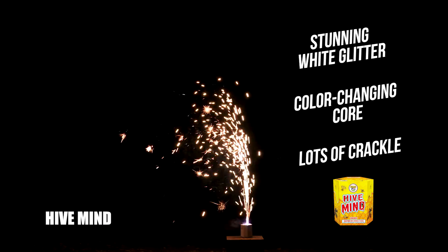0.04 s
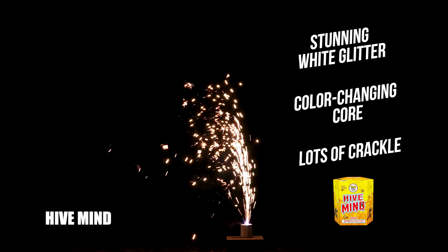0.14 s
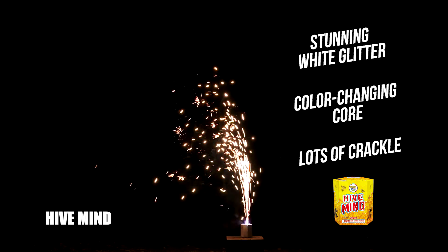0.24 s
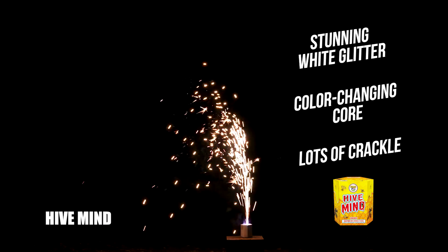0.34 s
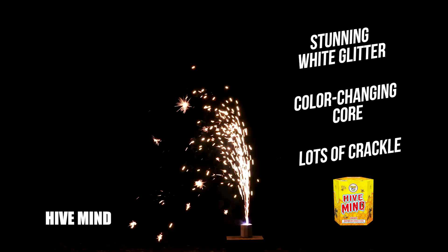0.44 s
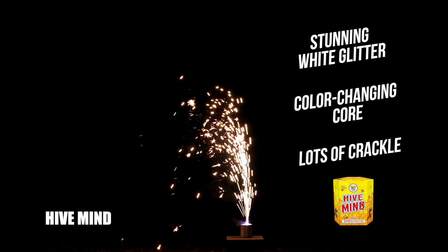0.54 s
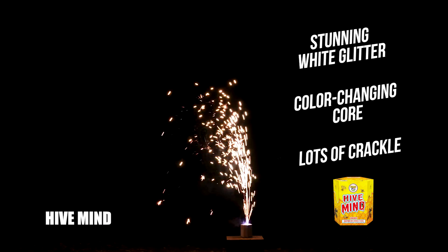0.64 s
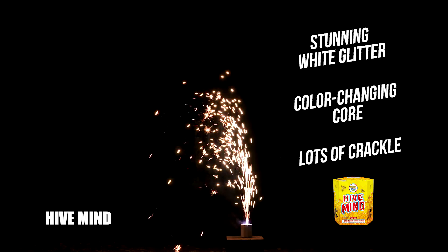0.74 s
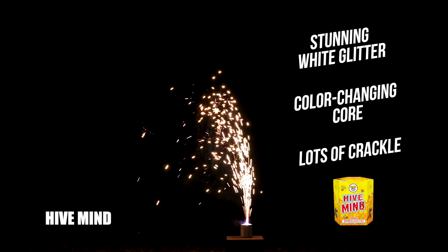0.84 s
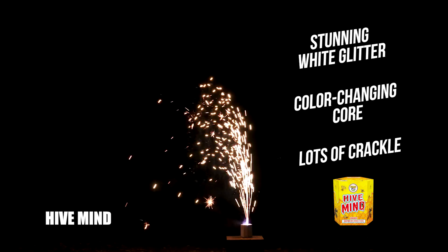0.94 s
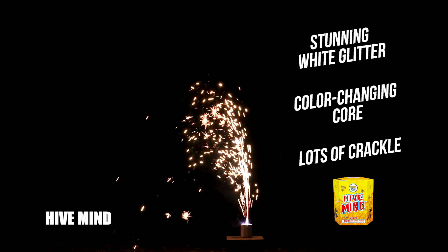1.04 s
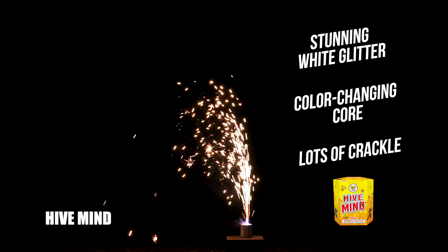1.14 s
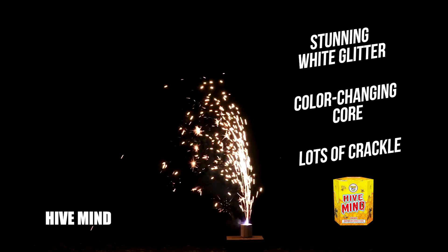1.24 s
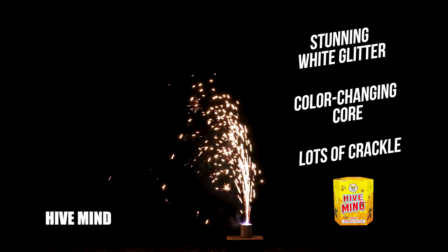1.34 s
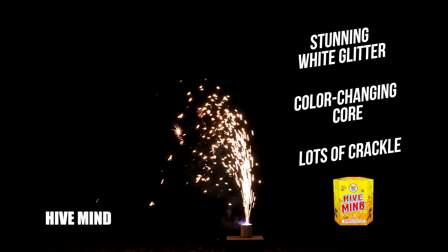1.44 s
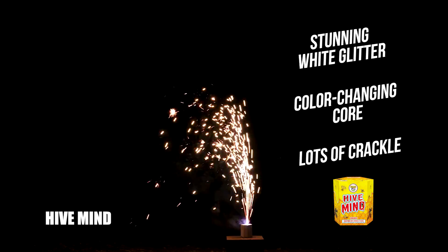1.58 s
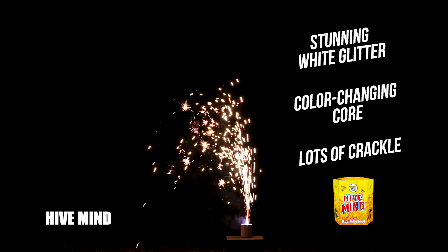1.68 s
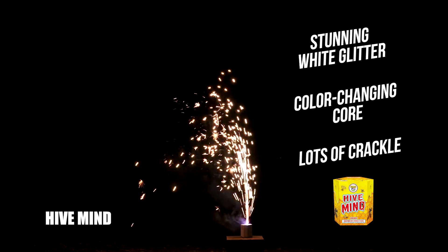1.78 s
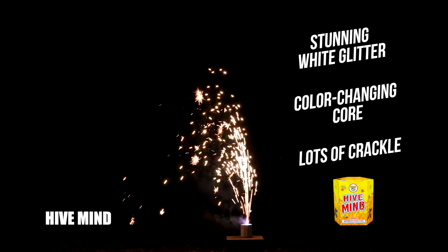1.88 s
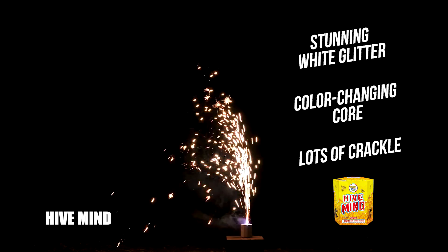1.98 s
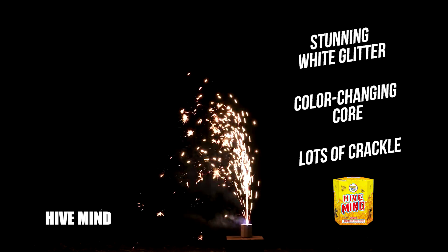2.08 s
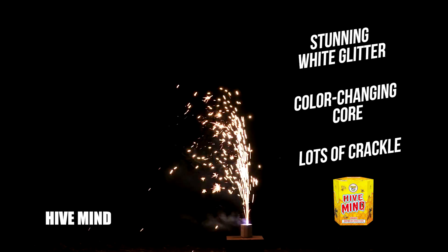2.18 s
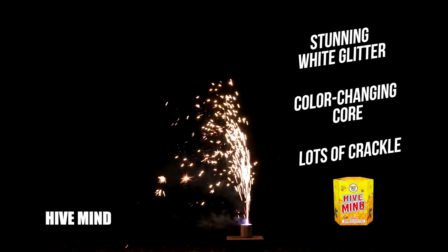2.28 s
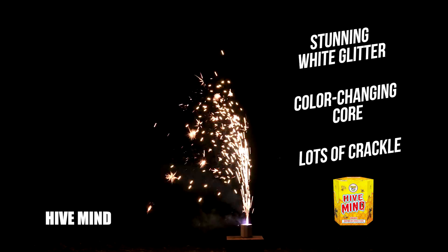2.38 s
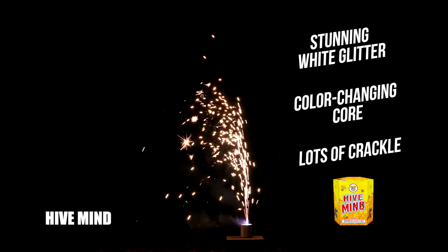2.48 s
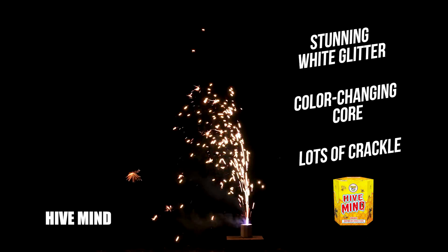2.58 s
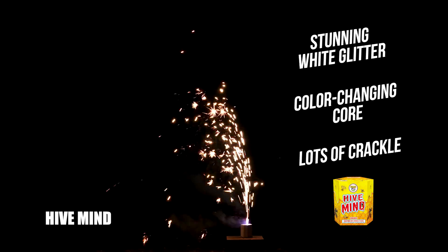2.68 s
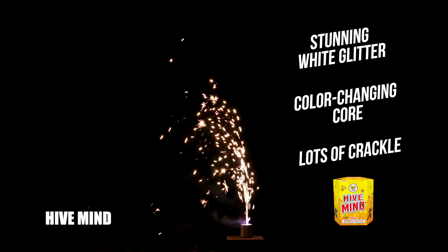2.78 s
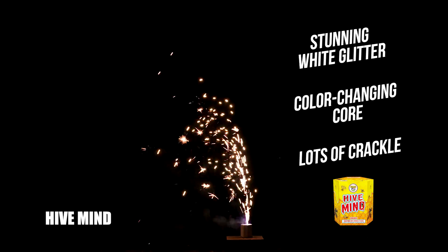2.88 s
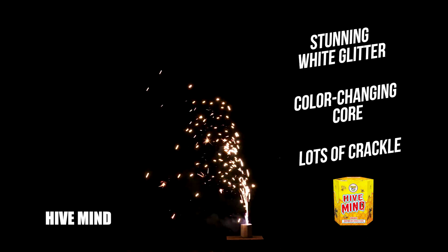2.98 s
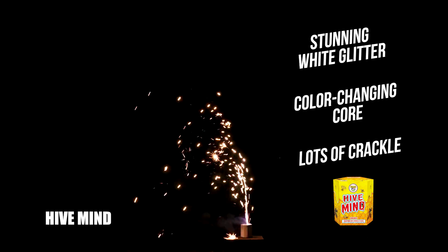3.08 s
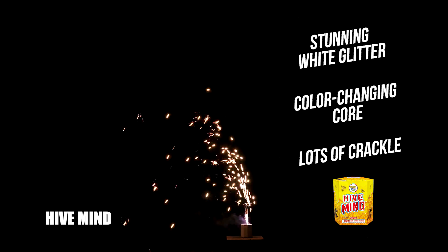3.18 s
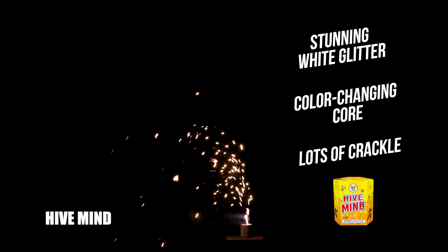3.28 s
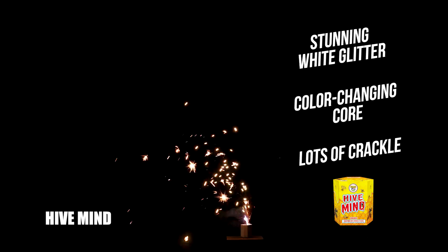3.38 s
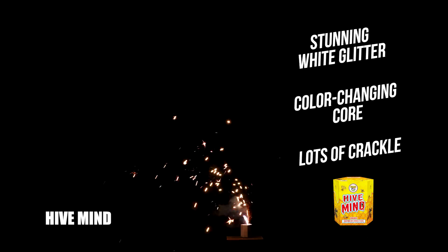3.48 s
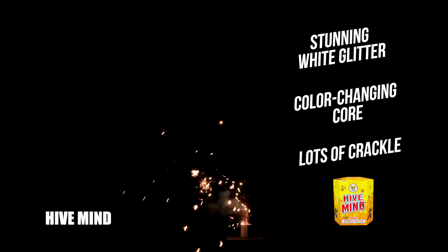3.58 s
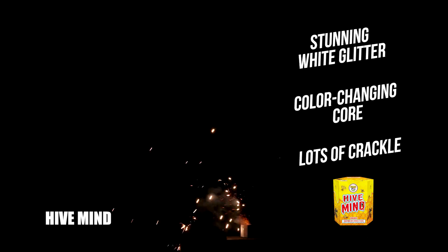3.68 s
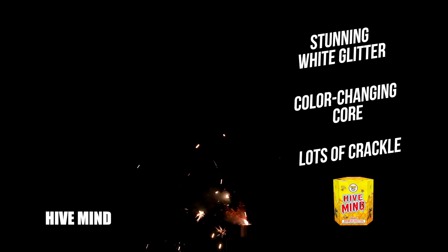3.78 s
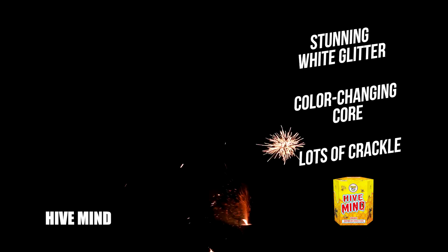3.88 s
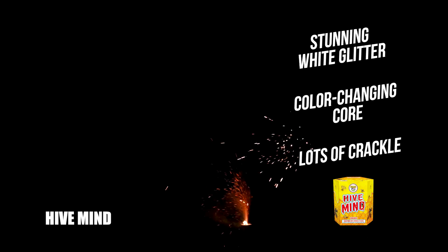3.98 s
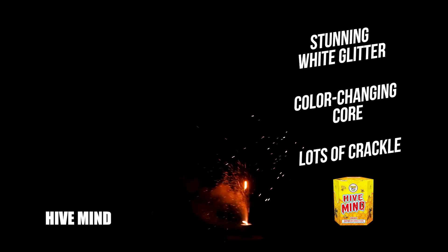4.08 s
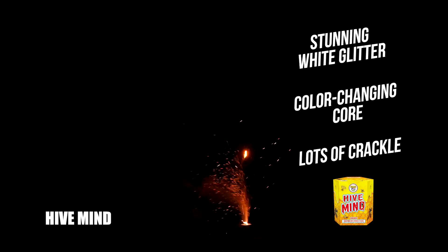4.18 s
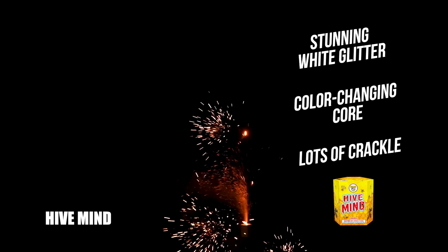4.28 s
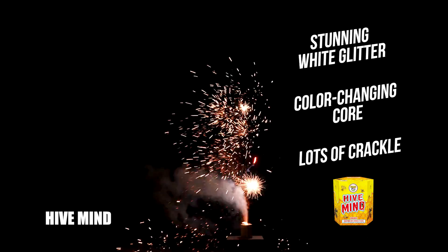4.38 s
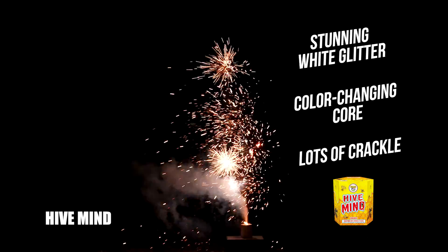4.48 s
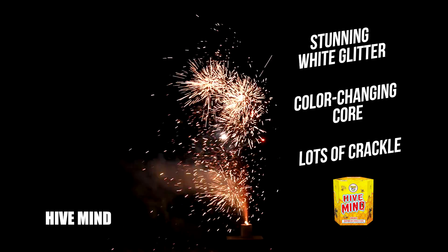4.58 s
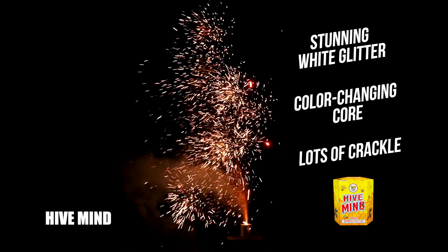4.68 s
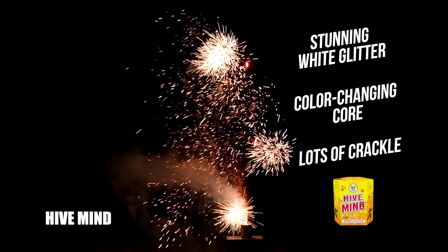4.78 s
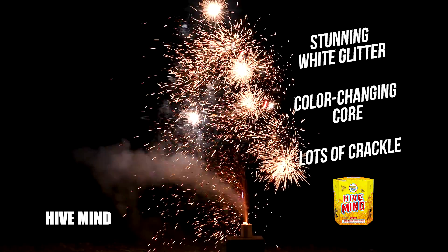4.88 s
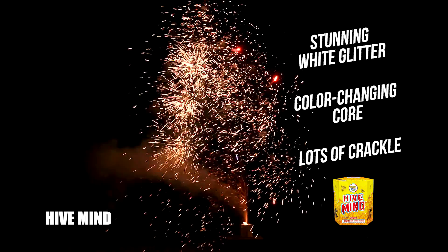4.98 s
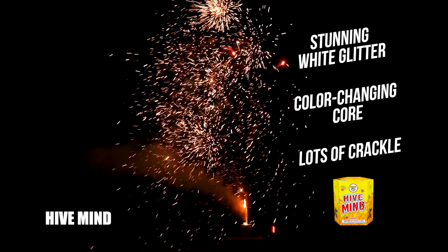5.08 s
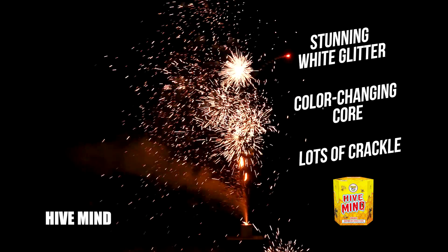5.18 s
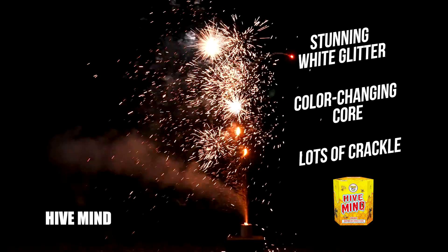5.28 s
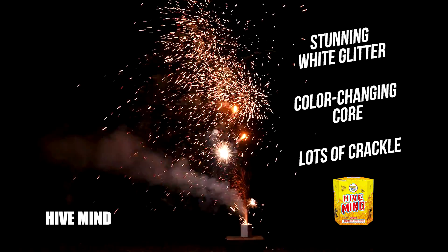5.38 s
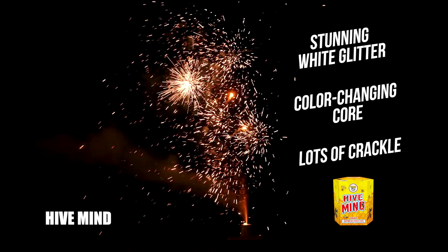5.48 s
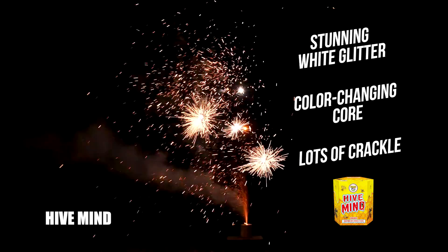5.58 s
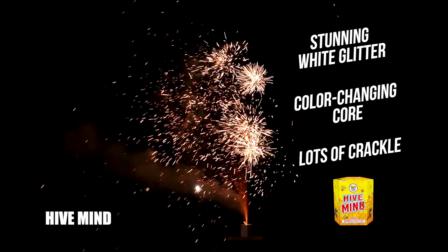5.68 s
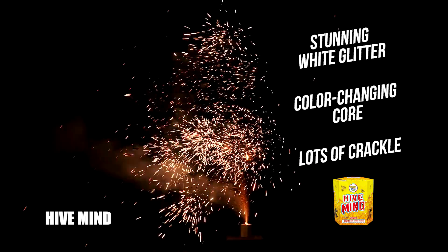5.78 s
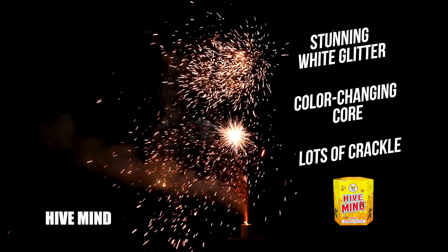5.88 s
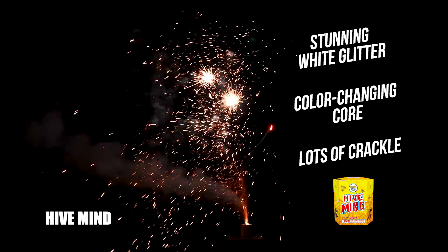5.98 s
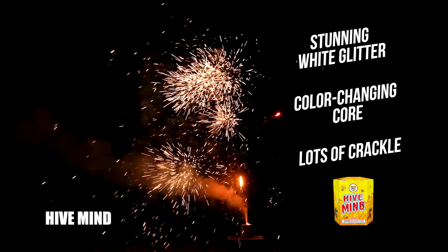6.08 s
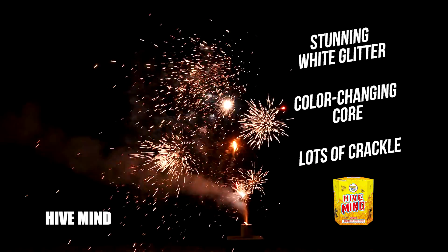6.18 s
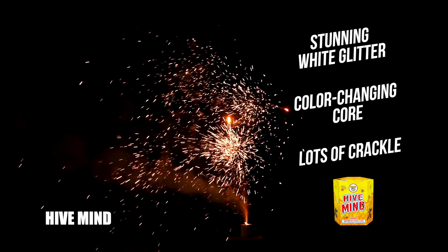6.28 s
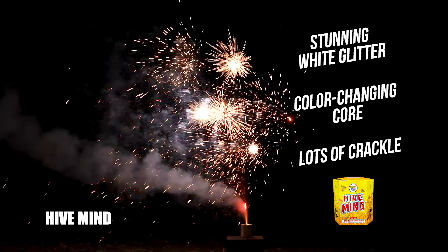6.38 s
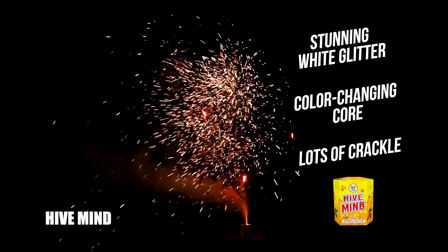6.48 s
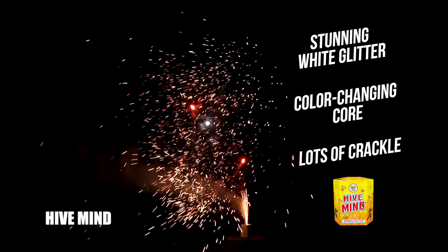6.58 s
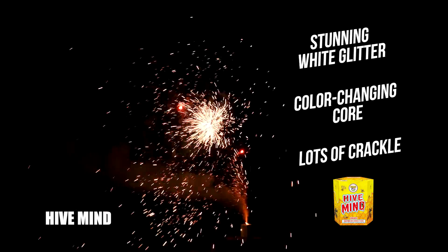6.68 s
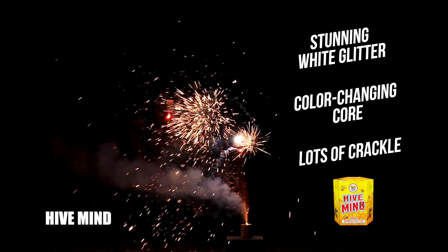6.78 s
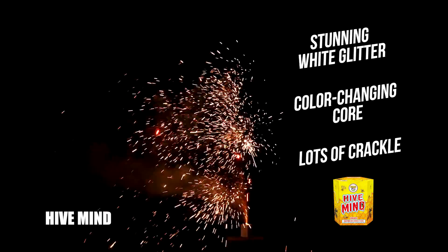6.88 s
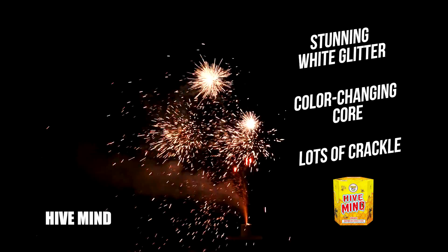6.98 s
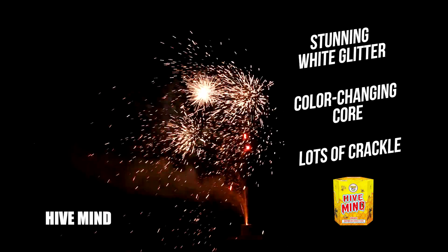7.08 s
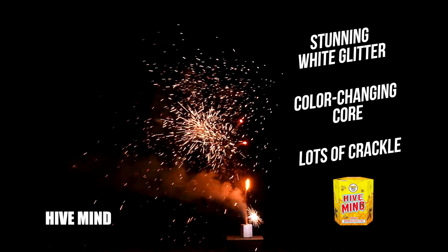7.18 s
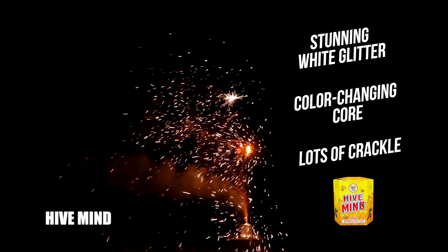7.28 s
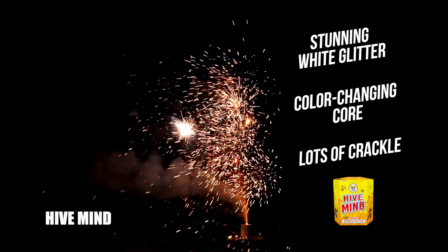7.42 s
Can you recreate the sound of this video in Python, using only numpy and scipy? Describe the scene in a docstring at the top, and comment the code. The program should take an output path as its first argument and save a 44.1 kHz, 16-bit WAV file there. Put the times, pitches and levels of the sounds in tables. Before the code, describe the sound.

Outdoors, a few metres from a stereo microphone, a fountain firework hisses and roars while sparks tick and spit. About halfway through it dies down to scattered spits, then a second stage catches. Dense clusters of loud crackles and sharp snaps follow one another to the end, with occasional dull puffs and a soft hiss beneath. The sound is fairly dry and leans slightly left, with a faint open-air rumble behind it.

```python
"""A ground fountain firework roars, then crackles, outdoors at night a few metres from a stereo pair.
Its gas jet roars and hisses through the nozzle, spitting sparks, then sputters out. A softer second
stage throws up crackle stars, each bursting in a cluster of tiny shocks a few milliseconds long.
Dull puffs cough from the tube. Underneath lie the rumble of the open air and a faint low drone."""
import sys
import numpy as np
from scipy import signal
from scipy.fft import rfft, irfft
from scipy.io import wavfile

SR = 44100
rng = np.random.default_rng(int(sys.argv[2]) if len(sys.argv) > 2 else 0)


def generate_wav(sig):
    """Save sig (samples, or channels by samples) to the path in sys.argv[1] as 16-bit PCM at SR."""
    pcm = np.round(np.clip(np.atleast_2d(sig).T, -1, 1) * 32767).astype(np.int16)
    wavfile.write(sys.argv[1], SR, pcm)


N = 328545
TIME = np.arange(N) / SR
HZ = np.fft.rfftfreq(N, 1 / SR)
BAND_LIMIT_HZ = 16000


def amp(db):
    """Decibels to gain."""
    return 10 ** (np.asarray(db) / 20)


def curve_at(points, hz):
    """A table joined by straight lines on a log-frequency axis."""
    f, value = np.transpose(points)
    return np.interp(np.log(hz + 1), np.log(f + 1), value)


def band_rms(gain, lo, hi):
    """Rms in one band of unit white noise shaped by gain."""
    return np.sqrt(np.mean(gain ** 2 * (HZ > lo) * (HZ < hi)))


def lowpass(x, hz, order=2):
    """Rolls off the top above hz."""
    return signal.sosfilt(signal.butter(order, min(hz, SR / 3), fs=SR, output="sos"), x)


def wander(rate_hz):
    """Random modulation of unit spread, moving at up to about rate_hz."""
    drift = irfft(rfft(rng.standard_normal(N)) / (1 + (HZ / rate_hz) ** 4), N)
    return drift / drift.std()


def shocks(times, sizes, spread_us):
    """Pressure spikes, each from its own direction, so the two mics hear it microseconds apart."""
    out = np.zeros((2, N))
    centre = np.round(times * SR)
    lag = rng.standard_normal(len(times)) * spread_us / 10 ** 6 / 2 * SR
    for channel, at in zip(out, (centre + lag, centre - lag)):
        taps = np.round(at).astype(int)[:, None] + np.arange(-6, 7)
        away = taps - at[:, None]
        spikes = sizes[:, None] * np.sinc(away) * np.sinc(away / 7)  # lands between samples
        inside = (taps >= 0) & (taps < N)
        np.add.at(channel, taps[inside], spikes[inside])
    return out


def knocks(times, sizes, bass_db, spread_us, bass_hz):
    """Shocks, each with its own low shelf for weight."""
    extra = shocks(times, sizes * (amp(bass_db) - 1), spread_us=0)
    return shocks(times, sizes, spread_us) + lowpass(extra, bass_hz, order=1)


def pops(spikes, tone, size=4096):
    """Turns every spike into a pop of the given colour: a steep front, then a shallow underpressure."""
    hz = abs(np.fft.fftfreq(size, 1 / SR))
    log_gain = np.log(amp(curve_at(tone, hz)))
    pop = np.fft.ifft(np.exp(np.conj(signal.hilbert(log_gain)))).real  # minimum phase
    treble_power = np.mean(np.exp(2 * log_gain) * (hz > 2000) * (hz < BAND_LIMIT_HZ))
    pop = pop[None, :size // 2] / np.sqrt(treble_power)
    return signal.oaconvolve(spikes, pop, axes=1)[:, :N]


# how alike the two mics hear a noise: f/Hz, correlation/0-1
STEREO_LIKENESS = [(30, 0.83), (200, 0.98), (2000, 0.98), (7000, 1), (15000, 0.38)]

def stereo_noise(gain):
    """Coloured noise, narrow in the mids and wide in the top treble."""
    left, other = rfft(rng.standard_normal((2, N)))
    same = curve_at(STEREO_LIKENESS, HZ)
    right = same * left + np.sqrt(1 - same ** 2) * other
    return irfft(np.array([left, right]) * gain, N)


# colour of the outdoor bed: f/Hz, level/dB
AIR_TONE = [(10, -12.5), (35, 3), (65, -4.5), (110, -8), (500, -13), (2000, -47)]

def air_rumble(db=-60.5):
    """The steady low rumble of the open air."""
    gain = amp(curve_at(AIR_TONE, HZ))
    return stereo_noise(gain / band_rms(gain, 0, SR)) * amp(db)


def drone(hz=66, width_hz=22, db=-61, peak_s=2.2, width_s=0.71):
    """A faint, narrow band of low noise swells and fades."""
    gain = 1 / (1 + (2 * (HZ - hz) / width_hz) ** 2)
    swell = 1 / (1 + ((TIME - peak_s) / width_s) ** 2)
    return amp(db) * swell * stereo_noise(gain / band_rms(gain, 0, SR))


def open_field(dry, near_db=-20, near_t60=0.13, far_db=-26, far_t60=0.18, dull_hz=2500):
    """Ground close by scatters a brief tail; things farther off return a faint, dull one."""
    t = np.arange(SR) / SR
    near = rng.standard_normal((2, SR)) * amp(-60 * t / near_t60)
    far = lowpass(rng.standard_normal((2, SR)), dull_hz, order=1) * amp(-60 * t / far_t60)
    tail = amp(near_db) * near / np.linalg.norm(near[0]) + amp(far_db) * far / np.linalg.norm(far[0])
    return dry + signal.fftconvolve(dry, tail, axes=1)[:, :N]


# dull puffs from the tube: t/s, level/dB, length/s, cutoff/Hz
PUFF_CUES = [(3.44, -54, 0.033, 110), (3.66, -52, 0.044, 330), (3.883, -47, 0.027, 400),
             (4.352, -25, 0.0065, 2380), (4.669, -35.5, 0.014, 246), (6.274, -32, 0.0084, 1200),
             (6.681, -38, 0.013, 912), (7.123, -38, 0.017, 252)]

def puffs():
    """Short gusts of gas cough out of the tube."""
    out = np.zeros(N)
    for s, db, length, cutoff_hz in PUFF_CUES:
        age = np.maximum(TIME - s, 0) / (length / 3)
        gust = lowpass(rng.standard_normal(N), cutoff_hz) * age * np.exp(-age)
        out += amp(db) * gust / np.linalg.norm(gust) * np.sqrt(length * SR)
    return out


def spray(per_s, end_s, scatter_db, count=400):
    """Loosely spaced sparks up to end_s: their times, and their levels in dB about the typical one."""
    jitter, strength = rng.standard_normal((2, count))
    times = (np.arange(count) + .5 + jitter / 2) / per_s
    burning = (times > 0) & (times < end_s)
    return times[burning], scatter_db * np.clip(strength[burning], -2, 2)


# the last spits, heard one by one as the first jet dies: t/s, level/dB
LAST_SPITS = [(2.775, -21), (2.7864, -24), (2.8317, -24), (2.8602, -25), (2.9075, -26), (2.9397, -29),
              (2.954, -30), (2.973, -29), (2.9811, -35), (3.0093, -29), (3.0259, -23.5), (3.0564, -27),
              (3.0716, -29), (3.1012, -26.5), (3.121, -24), (3.1244, -24), (3.1299, -36), (3.147, -24),
              (3.1662, -27), (3.1763, -27), (3.1795, -23), (3.2071, -28), (3.2175, -20), (3.2378, -26),
              (3.2548, -24), (3.2788, -37), (3.3343, -29), (3.3493, -29), (3.3523, -26.5), (3.3596, -39),
              (3.4366, -29), (3.4575, -29), (3.501, -28), (3.5307, -39), (3.6825, -36), (3.6921, -32),
              (3.7216, -33), (3.7324, -28.5), (3.8206, -32.5), (3.8957, -35)]
# the ticks fade with the jet: t/s, level/dB
TICK_ENVELOPE = [(2.65, -0.5), (3.1, -1), (3.4, -14), (3.85, -14)]
# colour of spits and ticks: f/Hz, level/dB
SPARK_TONE = [(60, -25), (300, 4.5), (1100, 7), (2200, 0.5), (3500, 0), (7000, 2.5), (9000, -5.5),
              (11500, -4.5), (15500, -15.5)]

def sparks(gain_db=7.0, spit_db=-26, tick_db=-32.5, knock_hz=2200, rebound=0.34, rebound_s=.0006):
    """The first jet sprays full-sized spits over small ticks, thinning out as its pressure collapses."""
    times, scatter = spray(per_s=42, end_s=2.76, scatter_db=1.5)
    times, level_db = np.vstack([LAST_SPITS, np.c_[times, spit_db + scatter]]).T
    sizes = amp(level_db + gain_db)
    knock_db = 0.4 + 0.59 * (spit_db - level_db)  # weaker spits are duller
    spits = knocks(times, sizes, knock_db, spread_us=11, bass_hz=knock_hz)
    # each spit rebounds in its own way, which colours it
    delay, strength = rng.random((400, 2))[:len(times)].T
    spits += shocks(times + rebound_s * delay, sizes * rebound * (2 * strength - 1), spread_us=11)
    times, scatter = spray(per_s=60, end_s=TICK_ENVELOPE[-1][0], scatter_db=2)
    fade_db = np.interp(times, *np.transpose(TICK_ENVELOPE))
    sizes = amp(tick_db + fade_db + scatter + gain_db)
    ticks = knocks(times, sizes, bass_db=-1, spread_us=4.1, bass_hz=knock_hz)
    return pops(spits + ticks, SPARK_TONE)


# resonances of the nozzle: f/Hz, width/Hz, boost/dB
NOZZLE_PEAKS = [(460, 41, 3), (1210, 270, 2.5), (1790, 310, 3)]

def gas_jet(envelope, tone, roar_trim_db, hiss_trim_db, flutter_db, sizzle_db, dulling):
    """Turbulent gas: a roar coloured by the nozzle and a hiss, both fluttering as the powder burns."""
    times, roar_points, hiss_points = np.transpose(envelope)
    roar_db, hiss_db = np.interp(TIME, times, roar_points), np.interp(TIME, times, hiss_points)
    boost_db = sum(db / (1 + (2 * (HZ - hz) / width) ** 2) for hz, width, db in NOZZLE_PEAKS)
    gain = amp(curve_at(tone, HZ) + boost_db)
    crossover = 1 / (1 + (HZ / 2900) ** 6)
    roar = stereo_noise(gain * np.sqrt(crossover)) / band_rms(gain, 300, 1500)
    hiss = stereo_noise(gain * np.sqrt(1 - crossover)) / band_rms(gain, 4000, 12000)
    # with dulling, the roar shrinks to its hollow bottom as the gas slows and the hiss fades
    hollow = irfft(rfft(roar) / (1 + (HZ / 620) ** 8), N)
    brightness = amp(dulling * np.maximum(hiss_db - hiss_db.max(), -14))
    roar = (hollow + (roar - hollow) * brightness) * amp(roar_db + roar_trim_db)
    hiss *= amp(hiss_db + hiss_trim_db + sizzle_db * wander(300))
    return (roar + hiss) * amp(flutter_db * wander(43))


# the first charge burns evenly, then its pressure collapses: t/s, roar level/dB, hiss level/dB
FIRST_BURN = [(0, -42.5, -43), (0.8, -41.5, -45), (1.8, -42, -44), (2.72, -41, -48.5), (3.0, -42, -59.5),
              (3.2, -49.5, -63), (3.36, -54.5, -65.5), (3.66, -55.5, -60.5), (3.85, -58, -74)]
# the second catches with a flare of hiss, then burns softly: t/s, roar level/dB, hiss level/dB
SECOND_BURN = [(3.85, -52, -48.5), (3.95, -53, -63.5), (4.4, -49.5, -56.5), (6.6, -52, -61.5),
               (7.4, -50.5, -57)]
# colour of each jet: f/Hz, level/dB
FIRST_JET_TONE = [(50, -37), (110, -13.5), (200, -8), (400, -2.5), (520, 0.5), (630, -2.5), (900, 2),
                  (1250, -2.5), (1500, -5), (2400, -6.5), (4000, -15), (5200, -10), (7600, -9), (8800, -14),
                  (11000, -15.5), (16000, -34)]
SECOND_JET_TONE = [(50, 4), (130, -8.5), (400, -1), (650, -2.5), (1200, -4.5), (1500, -8), (2000, -9),
                   (3000, -16), (4300, -21.5), (7200, -12.5), (8500, -17.5), (10500, -17.5), (16000, -33)]

def fountain(handover_s=3.84, crossfade_s=0.13):
    """The first charge burns out and the second takes over."""
    first = gas_jet(FIRST_BURN, FIRST_JET_TONE, roar_trim_db=0.9, hiss_trim_db=-0.7,
                    flutter_db=0.95, sizzle_db=1.03, dulling=0.7)
    second = gas_jet(SECOND_BURN, SECOND_JET_TONE, roar_trim_db=-1.5, hiss_trim_db=2.5,
                     flutter_db=0.7, sizzle_db=0.5, dulling=0)
    blend = np.clip((TIME - handover_s) / crossfade_s, 0, 1)
    return (1 - blend) * first + blend * second


def star_chain(s, length, db, star_s=.016, scatter_db=1.5, duty=.82, count=8):
    """A long burst is stars going off one after another; one row a star: t/s, length/s, level/dB."""
    share, strength = rng.standard_normal((2, count))[:, :max(1, round(length / star_s))]
    slot = length * amp(2 * share) / amp(2 * share).sum()
    burn = np.r_[slot[:-1] * duty, slot[-1]]
    star_db = scatter_db * strength
    star_db -= 10 * np.log10(np.sum(amp(star_db) ** 2 * burn) / length)  # keeps the burst's energy
    return np.c_[s + np.cumsum(slot) - slot, burn, db + star_db]


def star_grains(length, per_s=3600, scatter_db=5.5, clump_db=3.5, clump_s=.002, fade_db=4.0,
                lead_db=6.5, lead_s=.004, count=200):
    """Times and sizes of one star's grains: a large one early on, the rest in clumps; rms 1 overall."""
    jitter, strength, clumps = rng.standard_normal((3, count))[:, :max(3, int(per_s * length))]
    progress = (np.arange(len(jitter)) + jitter % 1) / len(jitter)
    age = progress * length
    clump = np.interp(age / clump_s, np.arange(len(clumps)), clumps)
    db = scatter_db * np.clip(strength, -2, 2) + clump_db * clump - fade_db * progress
    lead = np.argmin(abs(age - lead_s * rng.random()))
    db[lead] = lead_db + clump_db * clump[0]
    return age, amp(db) / np.linalg.norm(amp(db)) * np.sqrt(length * SR)


def star_push(length, db, typical_s=0.0058, typical_db=-26.5):
    """Extra bass of a star in dB: longer, weaker ones burn rather than crack, and so push more air."""
    doublings = np.log2(max(length / typical_s, .1))
    return 1.06 + 1.35 * doublings - 0.22 * (db - typical_db) + rng.standard_normal()


# the sharpest snaps among the crackle: t/s, level/dB
SNAP_CUES = [(4.424, -6), (4.6717, -7.5), (4.9522, -5), (4.9616, -9), (4.991, -5), (4.998, -11),
             (5.0406, -6), (5.1248, -5), (5.1673, -8), (5.9385, -6), (6.4265, -3.5), (6.447, -8),
             (6.4896, 0), (6.6235, -4.5), (7.176, -2)]

def snaps(gain_db=2.0, suction=0.27, suction_s=.00007):
    """A large grain explodes at once: a tall spike with a dip of suction right behind it."""
    times, level_db = np.transpose(SNAP_CUES)
    sizes = amp(level_db + gain_db)
    return shocks(np.r_[times, times + suction_s], np.r_[sizes, -suction * sizes], spread_us=4.4)


# bursts of crackle, each one star or a quick chain of them: t/s, length/s, treble level/dB
BURST_CUES = [(3.9891, 0.0085, -31.5), (4.3389, 0.0072, -25), (4.3544, 0.0047, -36), (4.424, 0.021, -33),
              (4.455, 0.0055, -30), (4.4635, 0.0063, -33.5), (4.5006, 0.01, -30), (4.534, 0.0057, -25.5),
              (4.5433, 0.03, -31.5), (4.5859, 0.011, -27.5), (4.6053, 0.012, -32.5), (4.6473, 0.011, -31.5),
              (4.6709, 0.018, -26.5), (4.7127, 0.013, -28.5), (4.7313, 0.038, -28.5), (4.7865, 0.0019, -32),
              (4.8248, 0.0091, -29.5), (4.8543, 0.0085, -31), (4.8665, 0.034, -28), (4.913, 0.052, -25.5),
              (4.9706, 0.0048, -36), (4.9786, 0.041, -27.5), (5.0299, 0.018, -31), (5.0544, 0.027, -28.5),
              (5.1231, 0.012, -26), (5.1428, 0.012, -28), (5.166, 0.0085, -28), (5.217, 0.0093, -31),
              (5.2418, 0.057, -28.5), (5.315, 0.01, -25.5), (5.3504, 0.01, -28.5), (5.3642, 0.044, -29.5),
              (5.4186, 0.015, -28), (5.4538, 0.014, -29), (5.5025, 0.015, -27.5), (5.5378, 0.0084, -29),
              (5.5548, 0.017, -32), (5.58, 0.013, -26.5), (5.6207, 0.016, -32.5), (5.6524, 0.0028, -27.5),
              (5.6857, 0.021, -26.5), (5.712, 0.0039, -28), (5.7212, 0.0038, -31.5), (5.7463, 0.002, -24.5),
              (5.7628, 0.017, -28.5), (5.7864, 0.011, -26.5), (5.8103, 0.005, -39), (5.8197, 0.039, -31),
              (5.8685, 0.011, -29.5), (5.9368, 0.016, -24), (5.993, 0.007, -27.5), (6.0426, 0.0065, -28.5),
              (6.097, 0.0099, -31), (6.113, 0.0009, -27), (6.1545, 0.03, -25.5), (6.2175, 0.0048, -28.5),
              (6.2615, 0.023, -29), (6.3, 0.0033, -29), (6.3076, 0.02, -27.5), (6.3462, 0.014, -27.5),
              (6.3746, 0.0075, -27), (6.424, 0.027, -26.5), (6.4858, 0.0079, -24.5), (6.4991, 0.05, -29),
              (6.561, 0.0046, -27), (6.62, 0.012, -25), (6.7144, 0.0037, -25), (6.7385, 0.0087, -29),
              (6.7625, 0.0082, -28.5), (6.7908, 0.0046, -23), (6.862, 0.011, -24), (6.8885, 0.0042, -27),
              (6.9102, 0.035, -29), (6.9516, 0.007, -31.5), (6.9967, 0.00095, -27.5), (7.038, 0.012, -28.5),
              (7.0574, 0.0056, -30.5), (7.0882, 0.009, -30.5), (7.1028, 0.011, -34.5), (7.1228, 0.014, -28),
              (7.168, 0.014, -32), (7.1941, 0.011, -30), (7.2634, 0.019, -30), (7.3074, 0.02, -32),
              (7.3323, 0.012, -30.5), (7.4023, 0.0085, -36), (7.4152, 0.0067, -32.5),
              (7.4422, 0.0084, -28.5)]
# colour of an exploding grain: f/Hz, level/dB
GRAIN_TONE = [(24, -48), (40, -8), (127, -1), (305, -1), (516, 1.3), (1050, -1.73), (2210, -9), (3470, -5),
              (6020, -1.5), (8550, -4.5), (10700, -4), (14800, -14), (16000, -12.5)]

def crackle(trim_db=0.16, bass_hz=1500, backflow=0.71, rebound=0.29, rebound_s=.00035):
    """Each star shatters into grains that explode in turn; their pushes add up to a small thump."""
    hits = []
    for s, length, db in np.vstack([star_chain(*burst) for burst in BURST_CUES]):
        age, sizes = star_grains(length)
        sizes *= amp(db + trim_db)
        bass_db = np.full(len(age), star_push(length, db))
        # each shock rebounds, with a delay and strength that give every star its own colour
        delay = rebound_s * rng.uniform(0.18, 1)
        strength = rebound * rng.uniform(-0.61, 1)
        hits += [(s + age, sizes, bass_db), (s + age + delay, sizes * strength, bass_db)]
    grains = knocks(*np.hstack(hits), spread_us=10.0, bass_hz=bass_hz)
    grains -= backflow * lowpass(grains, 174, order=1)  # the air that was pushed out flows back
    return pops(grains + snaps(), GRAIN_TONE)


def scene():
    """The jet over the outdoor bed; sparks, crackle and puffs get a short open-air tail."""
    return fountain() + air_rumble() + drone() + open_field(sparks() + crackle() + puffs())


# lean of the stereo pair: f/Hz, left minus right level/dB
MIC_BALANCE = [(30, 1.3), (120, 3.7), (600, 4.05), (2000, 2.4), (3200, 3.8), (5000, 3.3), (6200, 2.2),
               (8000, 2.4), (9000, .5), (11300, 0.4), (13500, 3.1)]
# how far the left mic trails the right: f/Hz, phase/rad
MIC_LAG = [(30, 0.092), (2800, .04), (5000, 0.34), (8400, 1), (10500, 0.44), (15000, .4)]

def record(dry):
    """The left mic is louder and slightly late; the tallest peaks are rounded, the top band-limited."""
    lean = amp(curve_at(MIC_BALANCE, HZ) / 2) * np.exp(-.5j * curve_at(MIC_LAG, HZ))
    pair = irfft(rfft(dry) * np.array([lean, 1 / lean]), N)
    pair /= (1 + (pair / .9) ** 6) ** (1 / 6)  # soft clip
    pair *= signal.windows.tukey(N, 200 / N)  # click-free ends
    high_cut = signal.firwin(255, BAND_LIMIT_HZ, window=("kaiser", 9), fs=SR)
    return signal.oaconvolve(pair, high_cut[None], "same")


dry = scene()
out = record(dry)
generate_wav(out)
```